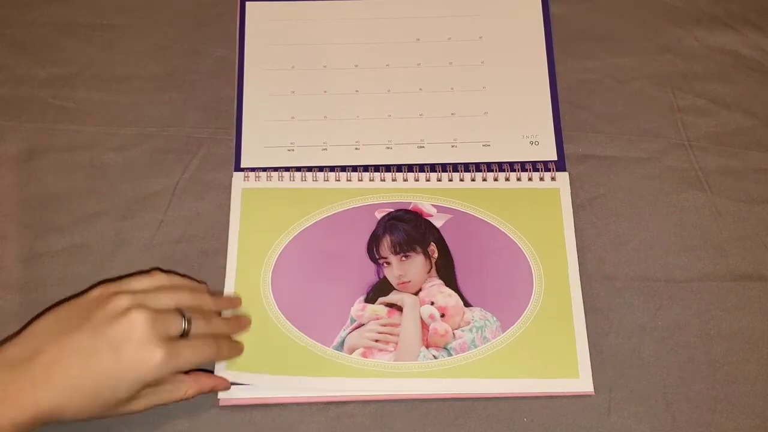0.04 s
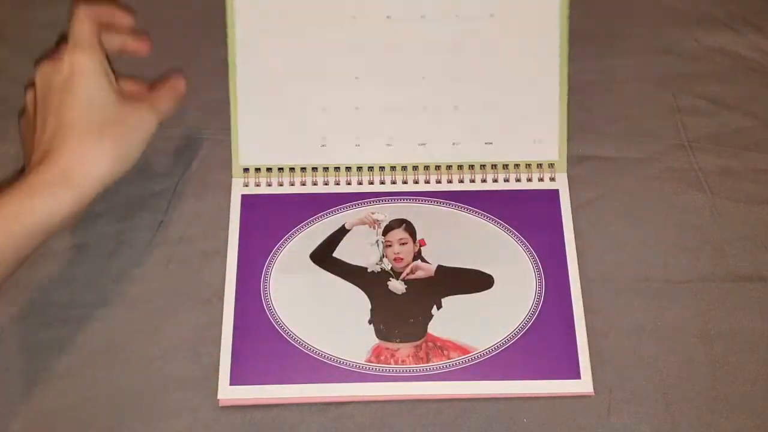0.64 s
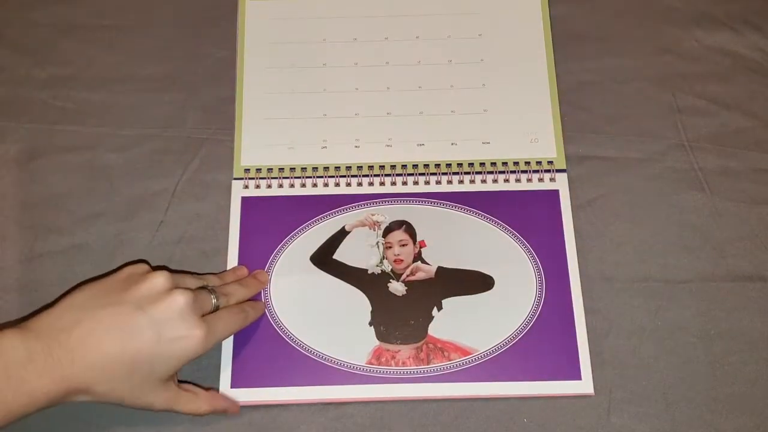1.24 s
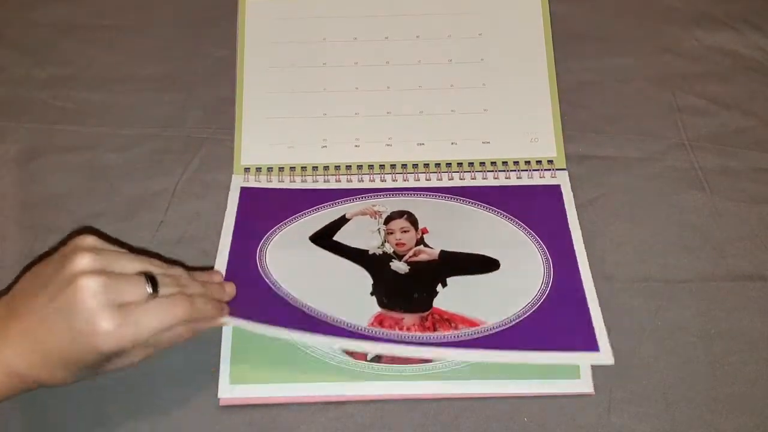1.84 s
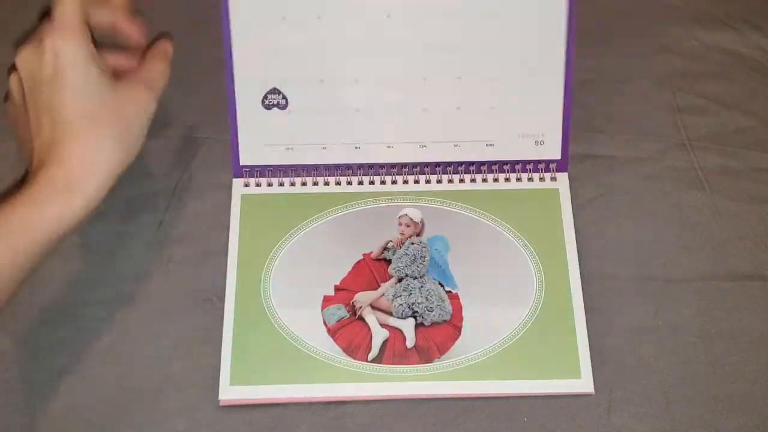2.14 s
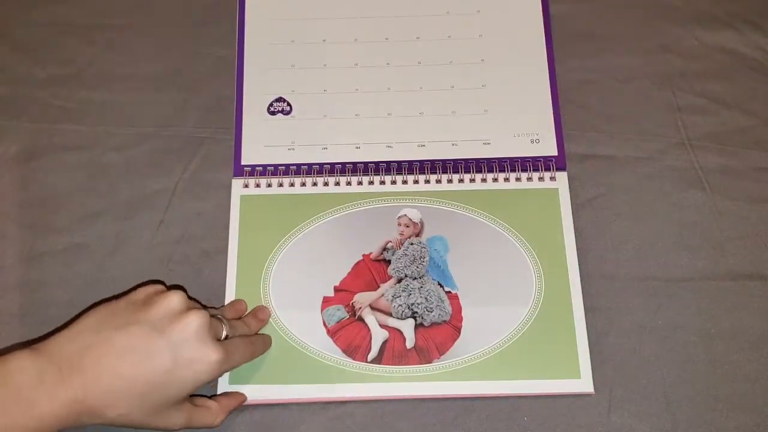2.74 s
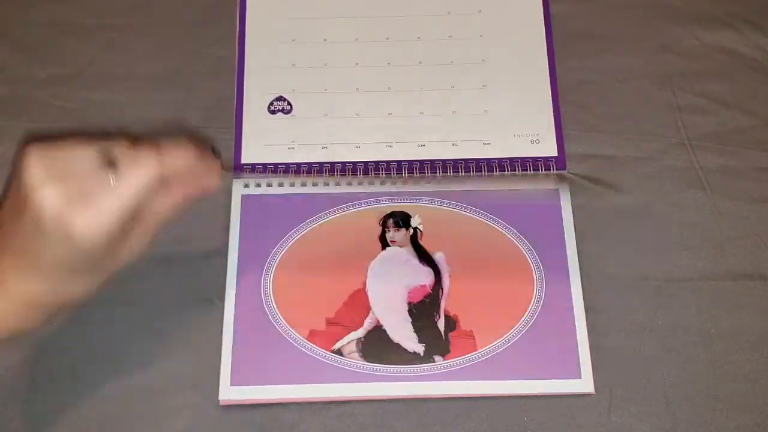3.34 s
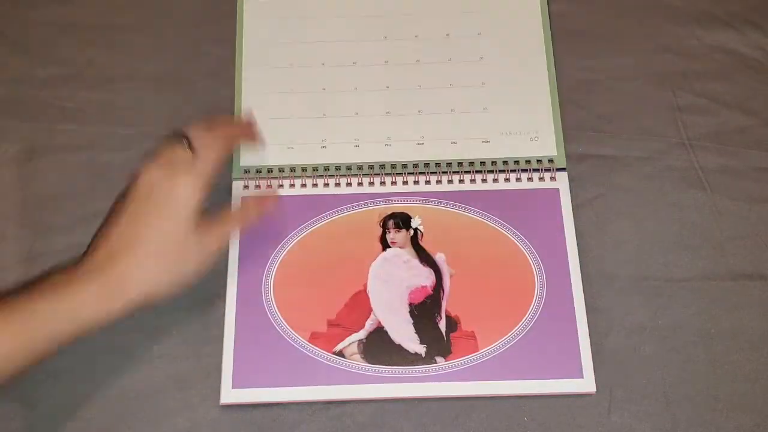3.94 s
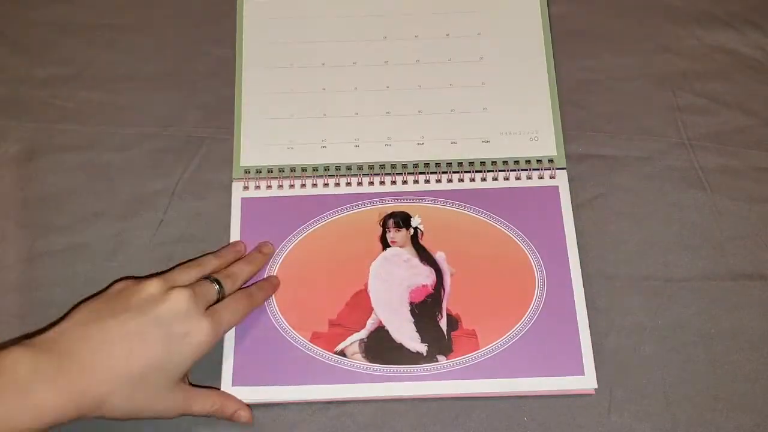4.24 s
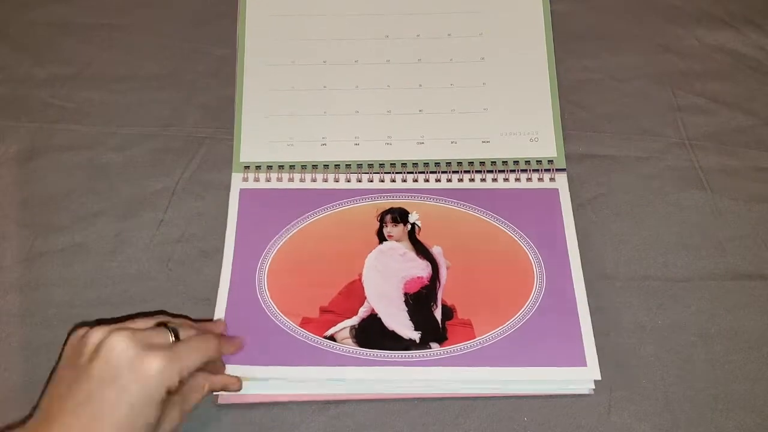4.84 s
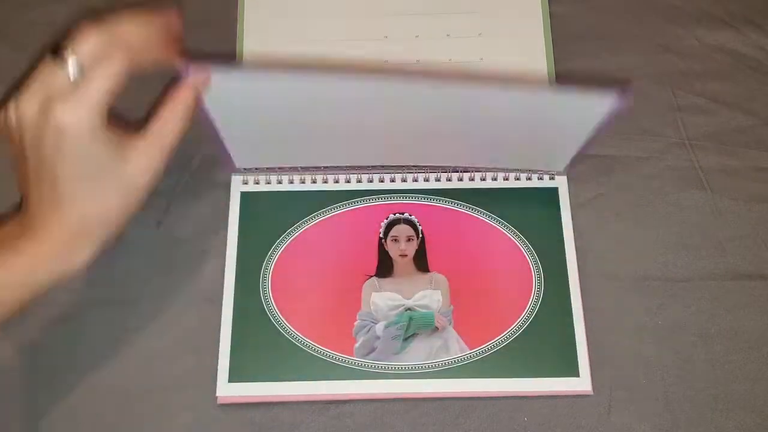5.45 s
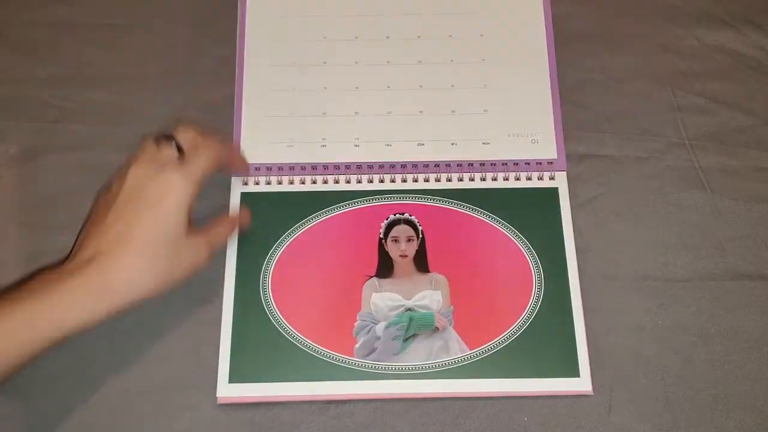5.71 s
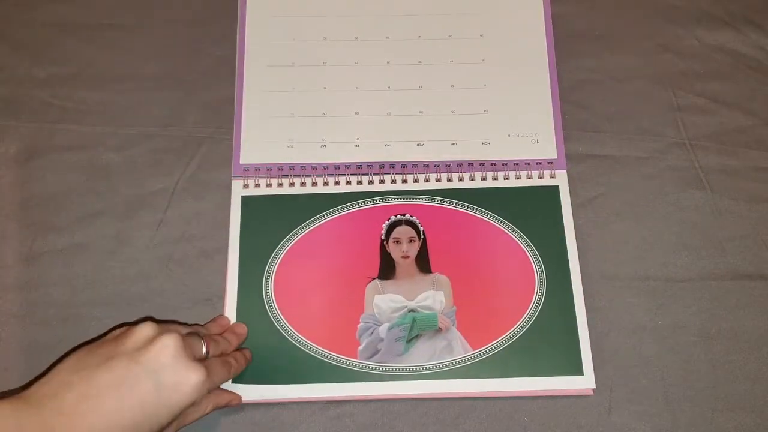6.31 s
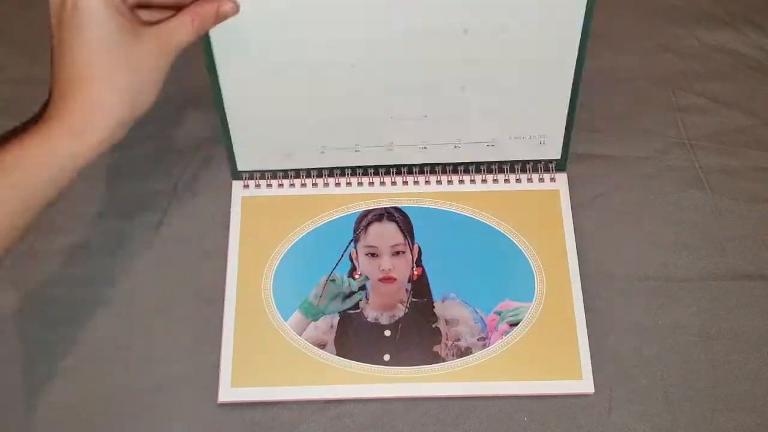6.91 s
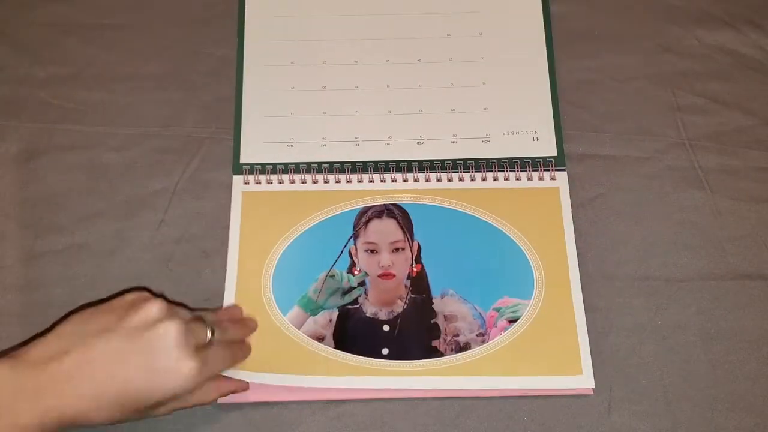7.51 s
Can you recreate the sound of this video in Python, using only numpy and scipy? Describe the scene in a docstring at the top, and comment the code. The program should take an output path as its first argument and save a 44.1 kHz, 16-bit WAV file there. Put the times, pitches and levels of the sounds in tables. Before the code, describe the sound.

Five stiff pages of a wire-bound calendar are turned by hand, close to stereo microphones, while a fan hums low and steady further off in a quiet room. At the start a fingertip slides along the edge with a falling hiss, and the first sheet flexes, pops and flaps around 0.3 seconds. Another slide at 1.6 seconds leads to a squeaky, crackling turn at about 1.8. From 2.8 seconds the finger slides and paper drags; the third page catches on the wire and snaps free at 3.3. Brushing at 4.3 to 4.6 seconds brings two dry pops near 4.7 and soft rustling until 5.5. Faint rubbing and squeaks from 6.2 seconds lead into a fuller swish near 6.8, ending in a pop and soft flap at 6.9. A last finger slide comes at 7.5 seconds. The brightest paper hiss leans left.

```python
"""Five pages of a wire-bound calendar, turned by hand on a cloth, close to a stereo pair of microphones.
A fingertip slides along the page edge with a falling hiss; the stiff sheet flexes, rustles and pops,
paper drags and squeaks on paper, and the punched holes rub and tick on the wire loops.
The third page catches and snaps free. Further off in the quiet room, a fan hums a little to the left."""
import sys
import numpy as np
from scipy import signal
from scipy.fft import rfft, irfft, next_fast_len
from scipy.io import wavfile
from scipy.ndimage import map_coordinates

SR = 44100
rng = np.random.default_rng(int(sys.argv[2]) if len(sys.argv) > 2 else 0)


def store_pcm(level_fs):
    """Save levels as 16-bit WAV."""
    pcm = np.round(np.clip(level_fs, -1, 1) * 32767).astype(np.int16)
    wavfile.write(sys.argv[1], SR, np.atleast_2d(pcm).T)


N = 333866
TIME = np.arange(N) / SR
PADDED = next_fast_len(N + 8192)
FREQS = np.fft.rfftfreq(PADDED, 1 / SR)
CUTOFF_HZ = 15750


# The sheet is lifted, swung round the wire and laid down, close to the microphones:
# (time [s], attack [s], length [s], flexing [dB], rubbing on the next page [dB], scraping the wire [dB])
RUSTLES = [(0.239, 0.008, 0.085, -57, -70.5, -64.5), (0.366, 0.005, 0.02, -64.5, -76, -71),
           (0.455, 0.059, 0.12, -72, -74.5, -72), (1.768, 0.0071, 0.019, -61, -65, -61),
           (1.831, 0.022, 0.11, -63, -77, -71.5), (1.981, .02, 0.085, -71, -83, -71),
           (3.266, 0.026, 0.033, -47.5, -59, -53.5), (3.5, .008, 0.061, -74.5, -76.5, -71.5),
           (3.722, 0.021, 0.058, -72, -75, -71.5), (3.77, 0.015, 0.11, -70.5, -88, -80),
           (4.721, 0.0049, 0.066, -66, -64, -71), (4.854, .02, 0.051, -68.5, -69.5, -65.5),
           (5.049, .025, 0.026, -73.5, -81, -69), (5.245, 0.026, 0.063, -68, -69.5, -76),
           (5.454, 0.037, 0.073, -74, -73.5, -71.5), (6.543, .01, 0.026, -77, -72.5, -72),
           (6.64, 0.19, 0.16, -50, -57, -64), (6.815, 0.035, 0.085, -64, -68.5, -67.5),
           (6.911, 0.014, 0.038, -59, -67.5, -65.5)]
# Spectra of the flexing, rubbing and scraping: (frequency [Hz], relative level [dB])
FLEX_COLOUR = [(200, -8), (700, 7), (1000, 7), (1450, 10), (2000, 1.5), (2900, 3), (3800, -0.5),
               (4400, -17), (12000, -31)]
RUB_COLOUR = [(2000, -18), (3800, -3), (4700, -7), (6800, -3), (7700, -11), (12000, -21)]
SCRAPE_COLOUR = [(5200, -31), (7000, -4), (8000, 2.5), (10000, -4.5), (12500, -1.5), (15500, -17)]

def page_swings(sag_db_per_s=46.5, release_t60=0.2, tremble_db=-13.5, tremble_t60=0.53):
    """The bending sheet rustles low, crackles on the next page and scrapes brightly round the loops."""
    flex = coloured(friction(slips_per_s=800, spread_db=4, smooth=1.0), FLEX_COLOUR)
    rub = coloured(friction(slips_per_s=340, spread_db=10, smooth=1.0), RUB_COLOUR)
    scrape = coloured(friction(slips_per_s=370, spread_db=5.5, smooth=0.41), SCRAPE_COLOUR)
    levels = 0
    for start, attack_s, length, *layers_db in RUSTLES:
        sag_db = -sag_db_per_s * length
        swing = stroke(start, length, attack_s, release_t60, sag_db)
        tremble = from_db(tremble_db) * stroke(start, length, attack_s, tremble_t60, sag_db)
        levels = np.maximum(levels, from_db(layers_db)[:, None] * np.maximum(swing, tremble))
    return sum(level * off_the_sheet(layer) for level, layer in zip(levels, (flex, rub, scrape)))


# A fingertip on the page edge, close up:
# (time [s], length [s], level [dB], swell [dB], gap resonance from [Hz], to [Hz], overtone [dB])
SLIDES = [(0.035, 0.04, -66, 6.5, 9400, 8000, 1), (0.074, 0.096, -56, -15, 8100, 5800, -2.5),
          (1.564, 0.059, -75, 24.5, 11500, 7800, 7), (1.639, 0.059, -65.5, 5, 7600, 4100, -7),
          (2.811, 0.17, -67.5, 11, 10200, 7600, -0.5), (4.328, 0.064, -70, 13, 10400, 8650, -2),
          (4.382, 0.094, -65.5, 6.5, 9700, 7600, -2), (4.575, 0.05, -56.5, 8.5, 13900, 4300, -1.5),
          (6.189, 0.025, -66, 4.5, 8700, 8100, -8), (6.335, 0.12, -71.5, 8, 12100, 9000, -2),
          (7.47, 0.11, -65, 4.5, 10200, 6900, 1.5)]
# Hiss round the gap's resonance and its overtone: (multiple of the resonance [ratio], relative level [dB])
GAP_SHAPE = [(.25, -18), (.6, -17), (.82, -12.5), (.92, 0), (1, -3.5), (1.15, 1), (1.4, -17), (3.5, -26)]
GAP_OVERTONE = [(1.1, -43), (1.3, -1.5), (1.48, -3.5), (1.72, -5), (2.1, -11)]

def finger_slides(pressure_db=1.3, max_opening=1.26, attack_s=0.029, release_t60=0.14):
    """Skin hisses on the edge under uneven pressure; the gap between pages falls in pitch as it opens."""
    skin = off_the_sheet(friction(slips_per_s=1300, spread_db=5.0, smooth=1.8))
    hz, frame_s, frames = signal.stft(skin, SR, nperseg=256)
    level, gap_hz, overtone_db = 0, SLIDES[0][4], 0
    for start, length, db, swell_db, from_hz, to_hz, upper_db in SLIDES:
        level = np.maximum(level, from_db(db) * stroke(start, length, attack_s, release_t60, swell_db))
        opening = np.clip((frame_s - start) / length, 0, max_opening)
        gap_hz = np.where(frame_s >= start, from_hz * (to_hz / from_hz) ** opening, gap_hz)
        overtone_db = np.where(frame_s >= start, upper_db, overtone_db)
    multiple = hz[:, None] / gap_hz
    resonance = from_db(at_hz(GAP_SHAPE, multiple))
    overtone = from_db(overtone_db + at_hz(GAP_OVERTONE, multiple))
    gain = np.hypot(resonance, overtone) * (hz[:, None] < CUTOFF_HZ)
    gain /= np.sqrt(np.mean(gain ** 2, axis=0))   # the glide keeps its power
    hiss = signal.istft(frames * gain, SR, nperseg=256)[1][:, :N]
    return from_db(pressure_db * drift(43)) * level * hiss


# Dry pops of the stiff sheet, close up:
# (time [s], crack [dB], crack resonance [Hz], width [octaves], card thump [dB], wire tick [dB])
KINKS = [(0.2412, -51, 3000, .55, -65, -63), (0.2938, -54, 2900, .7, -52, -68),
         (0.3672, -59, 2800, .7, -57, -60), (1.762, -51, 3400, .65, -59, -55),
         (1.8405, -63, 2600, .9, -62, -62), (1.8548, -52, 2900, .55, -52, -62),
         (4.7255, -47.5, 3900, .45, -52, -59), (4.7772, -49, 4000, .45, -57, -63),
         (6.7338, -51, 3000, 1.0, -57, -69), (6.9118, -53.5, 2300, .45, -51, -76)]

def kinks(crack_s=0.0008, flutter_db=-2.5, flutter_t60=0.026, room_db=-18, room_t60=0.13):
    """The card buckles: a crack, a flutter and a little room, with a thump below and a wire tick above."""
    out, t = np.zeros((2, N)), TIME[:SR // 6]
    crack = np.sqrt(crack_s * SR) * np.array([t == 0, 0 * t])   # the energy of crack_s in one sample
    decay = np.hypot(from_db(flutter_db - 60 * t / flutter_t60), from_db(room_db - 60 * t / room_t60))
    for time, crack_db, hz, octaves, thump_db, wire_db in KINKS:
        pop = crack + decay * rng.standard_normal((2, len(t)))
        card = from_db(crack_db) * in_band(pop, hz, octaves)
        thump = from_db(thump_db) * in_band(pop, hz=1230, octaves=1)
        wire = from_db(wire_db) * in_band(pop, hz=10300, octaves=0.66)
        start = int(time * SR)
        out[:, start:start + len(t)] += card - thump - wire
    return out


# Punched holes catching on the wire loops: (time [s], level over a quarter second [dB], dull above [Hz])
TICKS = [(2.012, -91, 15000), (3.1668, -86.5, 5000), (3.277, -73.5, 9080), (3.2815, -71.5, 8000),
         (3.2863, -58.5, 10800), (3.291, -53, 14800), (3.291, -57, 5550), (3.2943, -54.5, 6000),
         (3.3235, -76, 9970), (3.878, -92, 4000), (4.9, -96, 15000), (5.52, -88.5, 9000),
         (6.2235, -92, 19000)]
# Modes of the sheet and binding: (frequency [Hz], relative level [dB], t60 [s])
BINDING_MODES = [(792, 5, 0.13), (1260, 1.5, 0.11), (1332, 7.5, 0.027), (3370, -3.5, 0.078),
                 (3820, -6, 0.04), (4404, 3, 0.076), (6000, -4, 0.09)]
# Spectrum of the ticks: (frequency [Hz], relative level [dB])
TICK_COLOUR = [(110, -45), (600, 4.5), (950, -15.5), (1300, 8), (1700, -1.5), (3400, 5), (5000, 1.5),
               (6700, 2.5), (8000, -1), (15500, -12)]

def wire_ticks(flutter_t60=0.011, flutter_db=-1, room_t60=0.11, room_db=-7, ring_db=-10):
    """Each catch cracks from straight ahead; the sheet flutters, the binding rings, the room answers."""
    out, t = np.zeros((2, N + SR)), TIME[:SR // 4]
    crack = rms_one(np.array([t == 0, 0 * t]))
    for time, db, dull_hz in TICKS:
        flutter, room = rng.standard_normal((2, 2, len(t)))
        hit = crack + from_db(flutter_db) * rms_one(flutter * from_db(-60 * t / flutter_t60))
        hit += from_db(room_db) * rms_one(room * from_db(-60 * t / room_t60))
        band = signal.butter(2, [dull_hz / 5, dull_hz], "band", fs=SR)   # small catches have no body
        hit = rms_one(signal.lfilter(*band, hit))
        ring = sum(from_db(level - 60 * t / t60) * np.sin(2 * np.pi * (hz * t + rng.random((2, 1))))
                   for hz, level, t60 in BINDING_MODES)
        start = int(time * SR)
        out[:, start:start + len(t)] += from_db(db) * (hit + from_db(ring_db) * rms_one(ring))
    return coloured(out[:, :N], TICK_COLOUR)


# Low hollow flaps, and brighter brushes during a finger slide:
# (time [s], level [dB], pitch [Hz], width [octaves])
PUFFS = [(0.095, -57, 677, 1.3), (.288, -50.5, 736, 0.53), (.304, -55, 770, 0.73), (0.498, -61, 1080, 0.43),
         (1.001, -61, 740, 0.5), (3.289, -56.5, 850, 1.5), (4.366, -65.5, 4200, 2.2),
         (4.617, -52.5, 3700, 0.96), (6.913, -55.5, 890, 1.5)]

def soft_puffs(rise_s=0.007):
    """Short soft puffs of noise, each swelling quickly and dying in one resonance."""
    out, t = np.zeros((2, N)), TIME[:SR // 6]
    swell = t / rise_s * np.exp(1 - t / rise_s)
    for time, db, hz, octaves in PUFFS:
        puff = in_band(rng.standard_normal((2, len(t))), hz, octaves)
        start = int(time * SR)
        out[:, start:start + len(t)] += from_db(db) * swell * puff
    return out


# Paper whistling on paper:
# (time [s], end [s], from [Hz], to [Hz], level [dB], width [Hz], clean share [0-1])
SQUEAKS = [(0.158, 0.231, 3620, 3360, -65.5, 280, 0.26), (1.75, 1.815, 3550, 3660, -57.5, 480, 0.2),
           (2.945, 3.136, 5500, 4800, -74, 300, .12), (3.14, 3.299, 4850, 5480, -69, 240, .2),
           (6.34, 6.5, 3000, 3720, -81, 90, .45), (6.415, 6.48, 5200, 4600, -73.5, 150, 0.4),
           (6.665, 6.736, 3460, 3020, -62.5, 650, 0.03), (6.728, 6.752, 1597, 1450, -55.5, 110, 0.7)]

def squeaks():
    """Friction feeds a narrow resonance that glides as the page bends; regular slips make it whistle."""
    out = np.zeros((2, N))
    for start, end, from_hz, to_hz, db, width_hz, clean in SQUEAKS:
        span = np.arange(int(start * SR), int(end * SR))
        lowpass = signal.butter(2, width_hz, fs=SR, output="sos")
        grain = rms_one(signal.sosfilt(lowpass, rng.standard_normal((2, SR // 2))))
        phase = 2 * np.pi * np.cumsum(np.linspace(from_hz, to_hz, len(span))) / SR
        whistle = np.sqrt(clean) * np.array([np.cos(phase), np.sin(phase)])
        rasp = np.sqrt(1 - clean) * np.sin(phase) * grain[:, :len(span)]
        out[:, span] += from_db(db) * np.sqrt(2 * np.hanning(len(span))) * (whistle + rasp)
    return out


# The corner dragging over the page below:
# (time [s], length [s], level [dB], swell [dB], main resonance [Hz], upper resonance [dB])
DRAGS = [(3.155, 0.1, -65, 8, 3550, -11), (4.659, 0.3, -67, -9.5, 3900, -2),
         (6.23, 0.37, -82.5, 4.5, 3600, -4)]

def corner_drags(width_hz=800, upper_hz=5150, upper_width_hz=600, hiss_db=-17, wander_s=0.00028):
    """A dry rub: two page resonances over a weak bright hiss, wandering in pitch as the page bends."""
    rub = off_the_sheet(friction(slips_per_s=280, spread_db=4, smooth=1.0))
    wandering_samples = (TIME + wander_s * drift(8.3)) * SR
    upper = 1 / (1 + (2 * (FREQS - upper_hz) / upper_width_hz) ** 2)
    bright = from_db(hiss_db) * (FREQS > 1200)
    out = np.zeros((2, N))
    for start, length, db, swell_db, hz, upper_db in DRAGS:
        main = 1 / (1 + (2 * (FREQS - hz) / width_hz) ** 2)
        ringing = rms_one(filtered(rub, main + from_db(upper_db) * upper + bright))
        motion = stroke(start, length, attack_s=0.018, release_t60=0.25, swell_db=swell_db)
        out += from_db(db) * motion * ringing
    return np.array([map_coordinates(side, [wandering_samples], order=3) for side in out])


def friction(slips_per_s, spread_db, smooth):
    """Paper fibres slip in tiny bursts of uneven size over a smooth hiss; two unrelated signals."""
    slipping = rng.random(N) < slips_per_s / SR
    sizes = from_db(spread_db * np.minimum(rng.exponential(1, N), 2))
    decay = np.exp(-1 / (0.0024 * SR))   # each burst fades with a 2.4 ms time constant
    bursts = signal.lfilter([1], [1, -decay], slipping * sizes + 1e-18)
    return rms_one((rms_one(bursts) + smooth) * rng.standard_normal((2, N)))


def stroke(start, length, attack_s, release_t60, swell_db):
    """Gain of one movement of the hand: it rises, swells or sags evenly while it lasts, then dies away."""
    t = np.maximum(TIME - start, 0)
    rise = np.sin(np.pi / 2 * np.minimum(t / attack_s, 1)) ** 2
    release_db = -60 * np.maximum(t - length, 0) / release_t60
    return rise * from_db(swell_db * np.minimum(t / length, 1) + release_db)


def off_the_sheet(x, delay_s=0.0007, reflection=0.3):
    """Sound also bounces off the moving sheet; the changing detour sweeps soft notches through it."""
    detour_s = delay_s * from_db(2.5 * drift(2))
    echo = np.array([np.interp(TIME - detour_s, TIME, side) for side in x])
    return rms_one(x + reflection * echo)


# Air from the fan, further off in the room: (frequency [Hz], relative level [dB])
FAN_AIR = [(25, -36), (60, -30.5), (80, -15.5), (105, -12.5), (128, -10.5), (147, -2), (195, 0),
           (225, -13.5), (270, -13), (400, -21.5), (560, -26.5), (750, -37.5), (1200, -38), (1900, -51.5),
           (6000, -71)]
# How alike that air is at the two microphones: (frequency [Hz], likeness [0-1])
FAN_LIKENESS = [(30, 0.9), (80, 0.3), (130, 0.97), (250, 0.82), (600, 0.72), (1500, 0)]
# Its lean towards the left microphone: (frequency [Hz], left minus right [dB])
FAN_LEAN = [(330, 0), (750, 5), (1150, 0)]
# Fan and motor tones, in the centre: (frequency [Hz], level [dB])
FAN_TONES = [(112.8, -53), (241, -58), (441.8, -64), (517.6, -68.5), (1110.5, -76)]

def fan(air_db=-45.5, wander_hz=0.792, waver_db=1.7):
    """Rumbling air, its middle range leaning left, and tones that waver more the higher they lie."""
    air = from_db(air_db) * coloured(stereo(rng.standard_normal((2, N)), FAN_LIKENESS), FAN_AIR)
    air = filtered(air, from_db(at_hz(FAN_LEAN, FREQS) * [[.5], [-.5]]))
    tones = 0
    for hz, db in FAN_TONES:
        level = from_db(db + waver_db * np.sqrt(hz / 500) * drift(25.5))
        phase = 2 * np.pi * np.cumsum(hz + wander_hz * drift(4.65)) / SR
        tones += level * np.sin(phase)
    return air + np.sqrt(2) * tones


def from_db(db):
    return 10 ** (np.asarray(db) / 20)


def rms_one(x):
    return x / np.sqrt(np.mean(x ** 2) + 1e-20)


def at_hz(points, hz):
    """Read a spectrum on a log-frequency axis."""
    f, value = np.transpose(points)
    return np.interp(np.log(hz + 1e-9), np.log(f), value)


def filtered(x, gain):
    """Apply a gain per frequency."""
    return irfft(rfft(x, PADDED) * gain, PADDED)[..., :N]


def coloured(x, spectrum):
    """Give white sound a spectrum and keep its power."""
    return filtered(x, rms_one(from_db(at_hz(spectrum, FREQS)) * (FREQS < CUTOFF_HZ)))


def in_band(x, hz, octaves):
    """Pass white sound through one resonance and keep its power."""
    edges = hz * 2 ** (np.array([-.5, .5]) * octaves)
    band = signal.butter(2, edges, "band", fs=SR, output="sos")
    return signal.sosfilt(band, x) * np.sqrt(SR / 2 / np.diff(edges))


def stereo(pair, likeness):
    """Blend two unrelated signals, as mid and side, into left and right."""
    alike = at_hz(likeness, FREQS)
    mid = filtered(pair[0], np.sqrt((1 + alike) / 2))
    side = filtered(pair[1], np.sqrt((1 - alike) / 2))
    return np.array([mid + side, mid - side])


def drift(rate_hz):
    """Slow random wander with spread 1."""
    return rms_one(filtered(rng.standard_normal(N), 1 / (1 + (FREQS / rate_hz) ** 2) ** 2))


# How alike the paper is at the two microphones: (frequency [Hz], likeness [0-1])
PAPER_LIKENESS = [(500, 0.79), (3500, 0.14), (8000, 0.068)]
# The right microphone is shaded from the paper's top treble: (frequency [Hz], gain [dB])
RIGHT_SHADE = [(6900, -2), (7600, -17), (8800, -27), (11000, -32.5), (15000, -16)]

def scene(top_hz=14000):
    """Close paper sounds, their treble fading above 14 kHz, and the fan further off."""
    paper = (finger_slides() + page_swings() + corner_drags() + squeaks()
             + soft_puffs() + kinks() + wire_ticks())
    top_fade = 1 / np.sqrt(1 + (FREQS / top_hz) ** 20)
    left, right = filtered(stereo(paper, PAPER_LIKENESS), top_fade)
    right = filtered(right, from_db(at_hz(RIGHT_SHADE, FREQS)))
    return np.array([left, right]) + fan()


# Faint steady hiss in each channel, cut off above about 14 kHz: (frequency [Hz], relative level [dB])
HISS_LEFT = [(500, 5.5), (2500, -6), (7000, -4), (10000, -8.5), (11900, -4), (12600, 4.5), (13700, 6),
             (14600, -26.5)]
HISS_RIGHT = [(500, 6), (2800, -1), (3500, 9.5), (4300, 3.5), (7000, 3), (14000, -13), (15000, -36)]

def record(dry):
    """Each channel has its own faint hiss; the top is cut."""
    left = from_db(-77.5) * coloured(rng.standard_normal(N), HISS_LEFT)
    right = from_db(-81.0) * coloured(rng.standard_normal(N), HISS_RIGHT)
    lowpass = signal.ellip(10, .1, 80, CUTOFF_HZ, fs=SR, output="sos")
    return signal.sosfilt(lowpass, dry + np.array([left, right]))


dry = scene()
out = record(dry)
store_pcm(out)
```